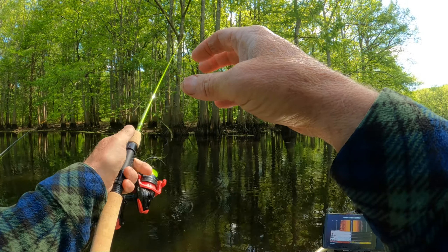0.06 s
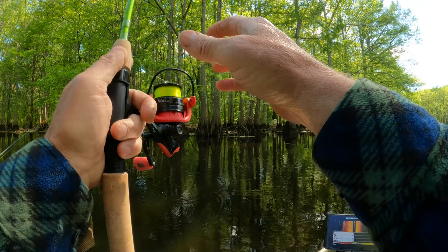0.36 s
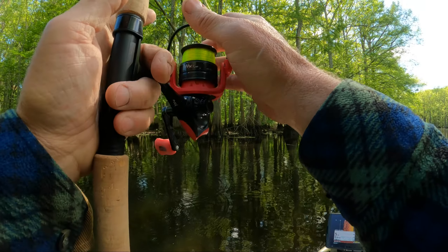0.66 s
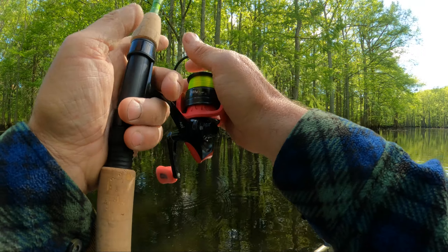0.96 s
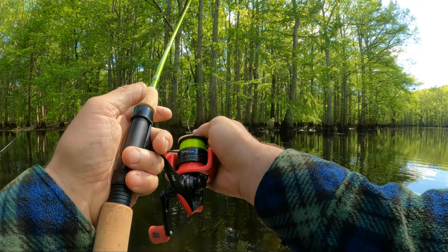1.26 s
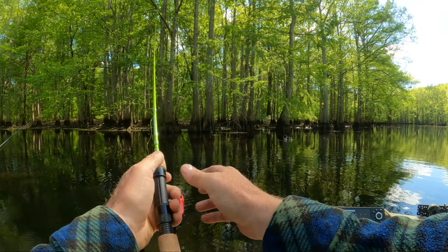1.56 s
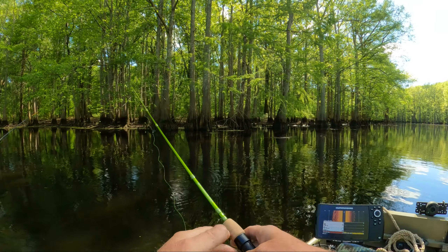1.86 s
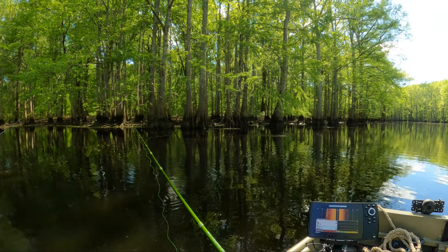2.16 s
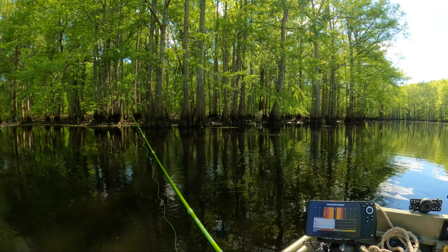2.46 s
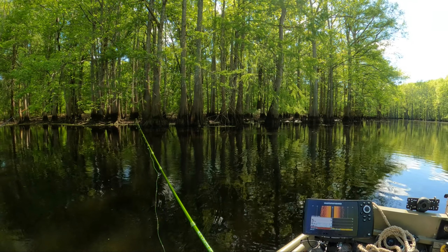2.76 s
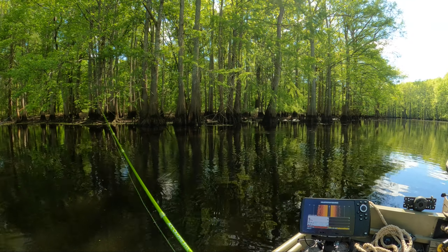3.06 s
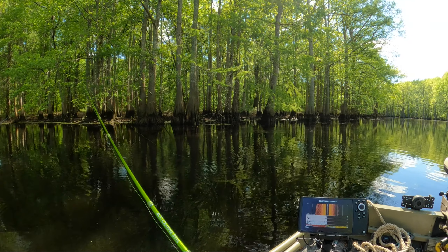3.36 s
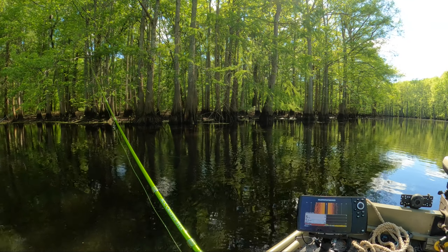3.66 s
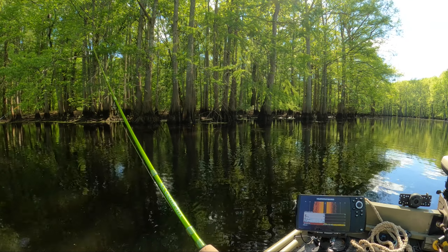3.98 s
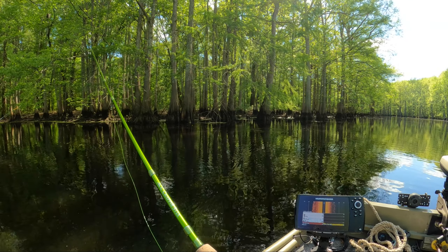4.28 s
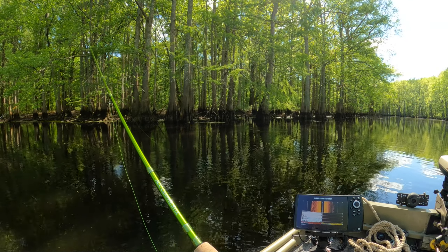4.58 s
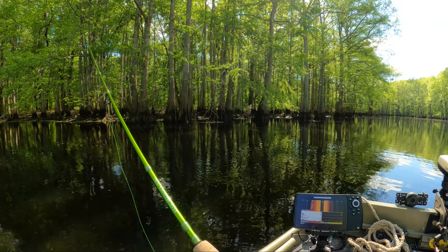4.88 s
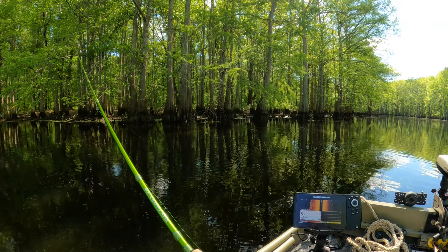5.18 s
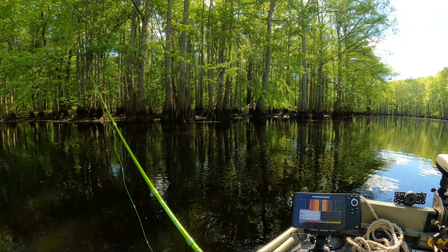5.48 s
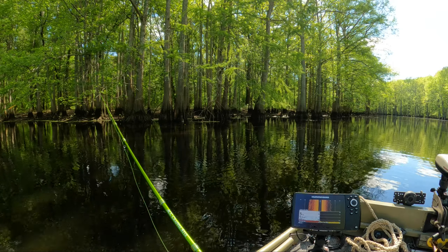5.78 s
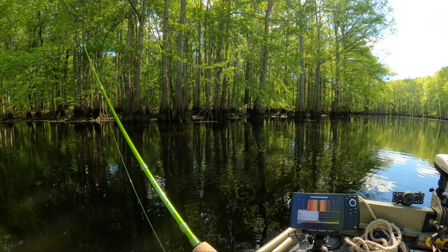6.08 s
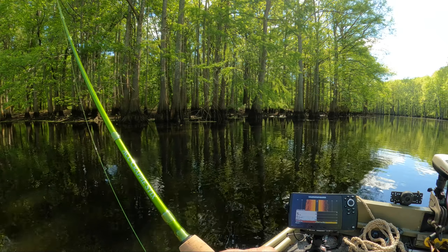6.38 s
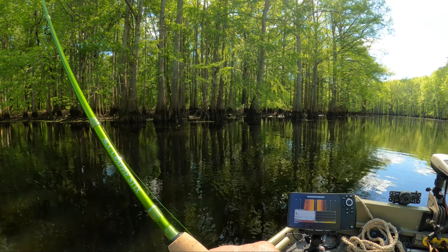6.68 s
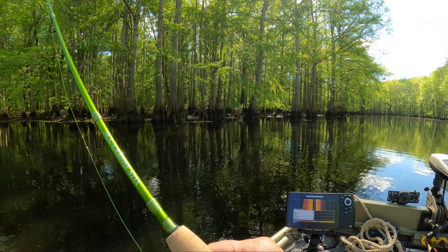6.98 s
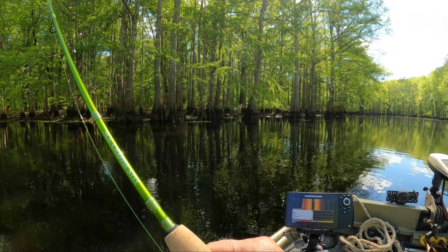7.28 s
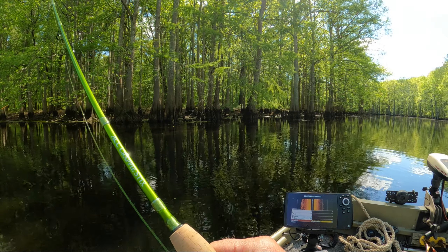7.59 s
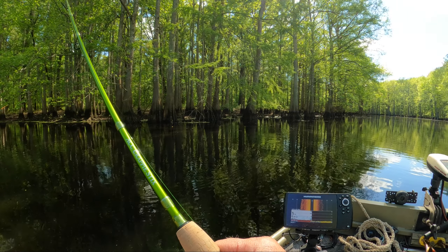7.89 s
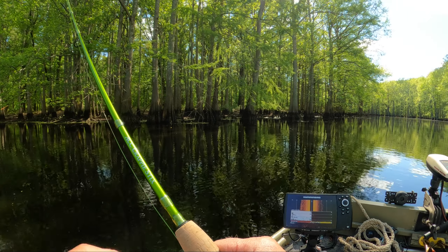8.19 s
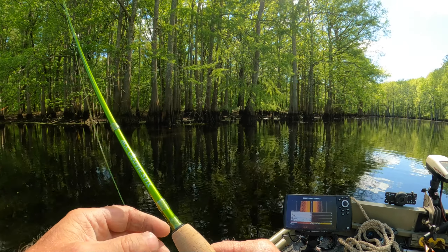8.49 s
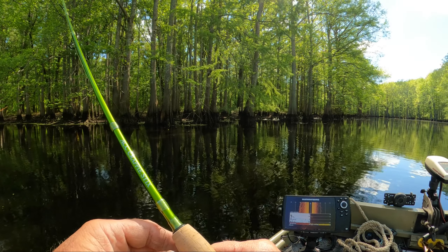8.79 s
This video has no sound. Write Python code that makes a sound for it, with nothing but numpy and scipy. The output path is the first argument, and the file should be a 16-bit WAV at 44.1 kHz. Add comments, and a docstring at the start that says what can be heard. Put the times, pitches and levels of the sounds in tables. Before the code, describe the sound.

A small electric motor hums at one low pitch throughout, with a light whirr, over the low drone of a metal boat on calm water. Right at the start, fishing line hisses off a spool close by with a thin whistle and a few clicks, dying away by about 1 second. The reel is handled, rasps briefly and snaps shut sharply at about 1.3 seconds. A sleeve rustles near 1.8 seconds, and dull knocks sound in the hull around 2 and 2.5 seconds. Taut line rasps again with small clicks until nearly 3 seconds. From there the motor carries on until about 9 seconds, with soft low bumps roughly once a second, a thin high hiss and faint ticks of tackle, the clearest near 8 seconds. Far birds give very faint, short chips around 3, 4 and 7.5 seconds.

```python
"""On calm water, a small electric motor pushes a metal fishing boat along, humming at one low pitch.
Line hisses off the spool and dies away; the reel is handled, rasps under taut line and snaps shut.
A sleeve rustles, and knocks ring the hull's low modes. Then the motor carries on over the drone of
hull and water, with soft low bumps, faint ticks of tackle, a thin hiss and far bird chips."""
import sys
import numpy as np
from scipy import signal
from scipy.fft import rfft, irfft, next_fast_len
from scipy.io import wavfile
from scipy.ndimage import map_coordinates

SR = 44100
rng = np.random.default_rng(int(sys.argv[2]) if len(sys.argv) > 2 else 0)


def put_to_file(sound):
    """Save the sound as 16-bit audio at rate SR, in the file named by the first command-line argument."""
    columns = np.atleast_2d(sound).T  # one column per channel
    safe = np.clip(columns, -1, 1)
    whole_steps = np.round(safe * 32767)
    wavfile.write(sys.argv[1], SR, whole_steps.astype(np.int16))


N = 394254
TIME = np.arange(N) / SR


def from_db(db):
    """Decibels to gain."""
    return 10 ** (np.asarray(db) / 20)


def rms_one(x):
    """Scale to unit power."""
    return x / np.sqrt(np.mean(x ** 2) + 1e-20)


def in_time(points):
    """Read a (time, value) curve at every sample."""
    return np.interp(TIME, *np.transpose(points))


def at_hz(points, hz):
    """Read a (frequency, value) curve along a log-frequency axis."""
    points_hz, values = np.transpose(points)
    return np.interp(np.log(hz + 1e-9), np.log(points_hz), values)


def pan(left_db):
    """Gains of the two channels for a left-minus-right level."""
    return from_db(np.array([[1], [-1]]) * left_db / 2)


def band(x, low_hz, high_hz, order=2):
    """Butterworth band-pass."""
    sos = signal.butter(order, [low_hz, min(high_hz, .45 * SR)], "band", fs=SR, output="sos")
    return signal.sosfilt(sos, x)


def envelope(s, length_s, attack_s, release_s=None):
    """Fade in up to time s, hold at 1, fade out; the release defaults to the attack time."""
    corners = s + np.array([-attack_s, 0, length_s, length_s + (release_s or attack_s)])
    return np.interp(TIME, corners, [0, 1, 1, 0]) ** 2


def swell(s, sigma_s):
    """A bell-shaped swell that peaks at time s."""
    return np.exp(-.5 * ((TIME - s) / sigma_s) ** 2)


def drift(rate):
    """Smooth random motion, changing about rate times a second; rms 1."""
    knots = rng.standard_normal(int(N / SR * rate * 2) + 4)
    return rms_one(map_coordinates(knots, [TIME * rate * 2 + 1], order=2))


def tone(hz):
    """A sine that follows a moving pitch; rms 1."""
    return np.sqrt(2) * np.sin(2 * np.pi * np.cumsum(hz) / SR)


def noise(spectrum, side=None):
    """Stereo noise of a given colour, rolled off beyond the curve's ends; rms 1."""
    # stereo image: (frequency [Hz], left-right likeness [0..1])
    likeness = [(30, 1), (150, 0.87), (300, 0.72), (700, 0.66), (1500, 0.683), (4000, 0.86), (12000, 0.8)]
    size = next_fast_len(N)
    hz = np.arange(size // 2 + 1) * SR / size + 1e-3
    rolloff = 1 / (1 + (spectrum[0][0] / hz) ** 4) / (1 + (hz / spectrum[-1][0] / 2) ** 4)
    shared, apart = rfft(rng.standard_normal((2, size))) * from_db(at_hz(spectrum, hz)) * rolloff
    alike = at_hz(likeness, hz)
    both = np.sqrt(1 + alike) * shared + np.sqrt(1 - alike) * apart * [[1], [-1]]
    return rms_one(irfft(both * pan(at_hz(side, hz) if side else 0), size)[:, :N])


def narrow_noise(hz, width_hz):
    """A band of noise around a steady or moving centre; rms 1."""
    phase = 2 * np.pi * np.cumsum(hz * np.ones(N)) / SR
    return rms_one(drift(width_hz / 2) * np.cos(phase) + drift(width_hz / 2) * np.sin(phase))


def struck(modes, t, spread_rad):
    """Decaying modes as (channel, mode, sample), left and right slightly out of phase."""
    hz, db, t60 = np.transpose(modes)[:, :, None]
    skew = rng.normal(0, spread_rad, hz.shape) * np.array([1, -1])[:, None, None]
    polarity = rng.choice([-1, 1], hz.shape)
    return polarity * from_db(db - 60 * t / t60) * np.sin(2 * np.pi * hz * t + skew)


def add(out, s, sound):
    """Mix a short sound in at time s."""
    start = round(s * SR)
    out[:, start:start + sound.shape[-1]] += sound[..., :N - start]


def air(hiss_db=-73.0, whine_db=-79.5):
    """A thin hiss wavers high above the hum; late on, a faint whine and one soft swish pass."""
    # colours of the hiss and the swish: (frequency [Hz], relative level [dB])
    hiss_colour = [(2500, -5), (4000, -8.5), (5400, -1.5), (7500, -5), (9500, -20.5), (12200, -19.5),
                   (14000, -39.5)]
    swish_colour = [(2600, 3), (4000, 1), (5500, -1.5), (6800, -5), (8200, -4.5), (10000, -23),
                    (12200, -19.5), (13300, -35.5)]
    # rise and fall of the swish: (time [s], level [dB])
    swish_level = [(5.6, -100), (5.85, -71), (6.03, -65.5), (6.14, -61), (6.35, -65.5), (6.56, -65),
                   (6.7, -74), (7.1, -100)]
    whine = from_db(whine_db) * envelope(5.96, 2.7, attack_s=.7) * narrow_noise(5570, width_hz=90)
    hiss = from_db(hiss_db - .8 * drift(1.8)) * noise(hiss_colour)
    swish = from_db(in_time(swish_level)) * noise(swish_colour)
    return (whine + hiss + swish) * pan(.98)


def birds(fall_octaves_per_s=4.0):
    """Far birds give short, high chips that slide down in pitch."""
    # chips: (time [s], starting pitch [Hz], level [dB])
    chips = [(2.995, 6600, -67), (3.92, 7540, -72), (7.578, 8200, -68.5)]
    out = 0
    for s, hz, db in chips:
        falling_hz = hz * 2 ** (-fall_octaves_per_s * np.clip(TIME - s, 0, 1))
        out += from_db(db) * envelope(s, length_s=.022, attack_s=.008) * tone(falling_hz)
    return out


def boat(drone_db=-47, wash_db=1.5, rest_db=-49.5, sway_hz=11.0, bump_hz=25):
    """The boat rocks with a deep rumble; the drone of hull and water lifts with each soft bump."""
    # swells of the rocking, and soft low bumps: (time [s], level [dB])
    rocks = [(.15, -24.5), (1.5, -35.5), (2.1, -34.5), (2.8, -39.5), (5.151, -31.5), (6.6, -49.5),
             (7.35, -49), (8.5, -37.5)]
    bumps = [(.93, -29.5), (1.44, -33), (2.36, -36), (3.3, -29.5), (4.301, -26), (5.302, -32), (6.342, -33),
             (7.38, -25), (8.469, -28.5)]
    # drone of hull and water: (frequency [Hz], relative level [dB])
    drone_colour = [(25, 14.5), (50, 9), (85, 3), (125, 0.5), (220, -2.5), (300, -5.5), (400, -9),
                    (520, -9), (650, -14), (760, -19.5), (1100, -35)]
    sway = from_db(rest_db) + sum(from_db(db) * swell(s, .23) for s, db in rocks)
    rumble = sway * np.sqrt(2) * np.sin(2 * np.pi * sway_hz * TIME + drift(9.8))
    for s, db in bumps:
        rumble += from_db(db) * swell(s, .047) * np.sin(2 * np.pi * (bump_hz * TIME + rng.random()))
    wash = sum(swell(s, .053) for s, _ in bumps)
    drone = from_db(drone_db + wash_db * wash + drift(10)) * noise(drone_colour)
    return rumble * pan(-7.0) + drone


def hull_knocks():
    """Dull blows ring the hull's low, quickly damped modes."""
    # hull modes: (frequency [Hz], level [dB], T60 [s])
    modes = [(92, 9.5, 0.029), (200, 5, 0.022), (361, 2.5, 0.021), (626, 1, 0.018)]
    # blows: (time [s], gain [dB], low cut [Hz])
    knocks = [(0.9035, -47, 300), (0.9322, -38, 300), (2.067, -26.5, 49.5), (2.464, -32, 420)]
    out, t = np.zeros((2, N)), TIME[:SR // 5]
    for s, db, low_hz in knocks:
        ring = struck(modes, t, spread_rad=.34).sum(axis=1)
        add(out, s, from_db(db) * band(ring, low_hz, 690, order=4))
    return out


def motor(shaft_hz=51.08, waver=.07, flutter=.003, whirr_db=-52, throb_db=7.5):
    """Shaft harmonics hum through the hull; the housing's whirr flares once a turn and fades."""
    # harmonics of the hum, and their early tint: (multiple of the shaft rate, gain [dB])
    harmonics = [(1, -14), (2, -7), (3, 0), (4, -19.5), (5, -16), (6, -18.5), (7, -23.5), (8, -28),
                 (9, -26.5), (10, -21), (11, -17.5), (12, -38), (13, -22.5), (15, -41.5), (17, -37),
                 (21, -43.5), (22, -36), (23, -27.5), (24, -38), (25, -27), (32, -29), (39, -39.5)]
    early_colour = [(2, -1.5), (3, 0), (5, 2), (6, 4), (7, 2), (11, -1), (13, -1), (15, 0)]
    # fader ride of the hum: (time [s], level [dB])
    hum_level = [(0, -42.5), (1.3, -45), (2.3, -41.5), (5.3, -42), (8.94, -42.5)]
    # whirr of the housing: (frequency [Hz], relative level [dB])
    whirr_colour = [(700, -39.5), (820, -13), (960, -2.5), (1050, 1), (1090, -6.5), (1150, 2), (1280, -0.5),
                    (1430, -0.5), (1640, 2.5), (1830, -4.5), (1980, -1.5), (2220, -9.5), (2360, -9),
                    (2500, -12.5), (2800, -16.5), (3800, -24.5), (6000, -35), (10000, -54.5)]
    # its balance: (frequency [Hz], left minus right [dB])
    whirr_side = [(700, -2.5), (1300, 6), (2400, 4), (4400, -2), (8000, 11)]
    turns = shaft_hz * TIME + .012 * drift(.7) + .0014 * drift(8)
    early = envelope(0, 2.53, .36)   # the tint holds, then the colour settles
    hum = 0
    for multiple, db in harmonics:
        early_db = np.interp(multiple, *np.transpose(early_colour))
        tint = 1 + (from_db(early_db) - 1) * early
        strength = from_db(db) * tint * (1 + waver * drift(4)) + flutter * drift(6)
        hum += strength * np.sin(2 * np.pi * (multiple * turns + rng.random()))
    stroke = np.interp(turns % 1, [0, .13, 1], [0, 1, 0])   # fast rise, slow fall
    flare = rms_one(from_db(throb_db * stroke + drift(25)))
    whirr = from_db(whirr_db + .67 * drift(.89)) * flare * noise(whirr_colour, whirr_side)
    return np.sqrt(2) * from_db(in_time(hum_level)) * hum * pan(-.9) + whirr


def tackle(t60_s=.013, top_hz=8500):
    """Light touches of line and tackle: tiny bursts, dry or pinging, that die at once."""
    # ticks: (time [s], peak [dB], centre [Hz], half width [octaves])
    ticks = [(3.436, -47, 4370, .7), (3.528, -46, 4400, .45), (3.82, -43.5, 5200, 0.51),
             (4.257, -47.5, 7000, .13), (5.37, -52, 5200, 0.54), (5.522, -48.5, 6500, .5),
             (7.852, -37, 3300, 0.37), (8.048, -44, 4400, .35), (8.1345, -43.5, 7000, 0.38),
             (8.143, -43, 6500, .12), (8.168, -48, 3800, 0.61), (8.185, -48, 3800, .45),
             (8.6722, -48.5, 6500, 0.15)]
    out, t = np.zeros((2, N)), TIME[:SR // 10]
    lowpass = signal.butter(2, top_hz, fs=SR, output="sos")
    for s, db, hz, octaves in ticks:
        burst = rng.standard_normal(len(t)) * from_db(-60 * t / t60_s)
        tick = signal.sosfilt(lowpass, band(burst, hz / 2 ** octaves, hz * 2 ** octaves))
        add(out, s, from_db(db) * tick / np.abs(tick).max())
    return out * pan(4.5)


def handling(sleeve_rest_db=-82.5, grain_db=1.5):
    """As the arm moves, the sleeve rubs brightly and the hand dully on the rod, in many small catches."""
    # arm moves: (start [s], length [s], sleeve level [dB], hand level [dB])
    moves = [(0.0, 1.1, -68.5, -57), (0.898, 0.081, -53, -45.5), (1.09, 0.26, -61, -52),
             (1.5, 0.5, -64, -56.5), (1.747, 0.019, -50.5, -60), (1.791, 0.085, -45.5, -56),
             (1.919, 0.051, -47.5, -54), (2.05, 0.025, -67, -52), (2.146, 0.098, -66, -52),
             (2.31, 0.16, -62, -54), (2.545, 0.07, -61, -49), (2.667, 0.056, -57, -47.5),
             (2.78, 0.36, -71, -61.5), (3.747, 0.37, -78, -85), (5.299, 0.27, -72.5, -85),
             (7.684, 0.58, -70.5, -81.5), (8.59, 0.4, -75, -78)]
    # colours of cloth and grip: (frequency [Hz], relative level [dB])
    sleeve_colour = [(1200, -7), (2200, -6), (3200, -4.5), (4000, -3), (5300, -0.5), (7200, -0.5),
                     (8300, -4), (10000, -18.5), (12200, -13), (13500, -29), (16000, -40.5)]
    hand_colour = [(50, 5.5), (110, 7), (200, -4), (330, -3), (600, -7.5), (800, -16.5), (1400, -9.5),
                   (2400, -16), (4000, -22.5)]
    # the sleeve sings on fast strokes: (start [s], length [s], centre [Hz], level [dB])
    zips = [(1.81, .035, 7150, -47), (1.856, .02, 7600, -52), (1.933, 0.045, 5500, -53.5)]
    rub, grip = from_db(sleeve_rest_db), 0
    for s, length, sleeve_db, hand_db in moves:
        motion = envelope(s, length, attack_s=.013 + .42 * length)   # longer moves ease in and out
        rub += from_db(sleeve_db) * motion
        grip += from_db(hand_db) * motion
    grain = from_db(grain_db * drift(200))
    sleeve = rub * grain * noise(sleeve_colour)
    hand = grip * grain * noise(hand_colour)
    for s, length, hz, db in zips:
        sleeve += from_db(db) * envelope(s, length, attack_s=.02) * narrow_noise(hz, width_hz=600)
    return sleeve * pan(.76) + hand


def line_rasp(slips_per_s=170, uneven=.3, slip_depth_db=13):
    """Taut line sticks and slips over the reel in a fast, uneven run; each slip flares and fades."""
    # pulls that wind the line tight: (start [s], length [s], level [dB])
    pulls = [(0.884, 0.11, -54.5), (2.582, 0.052, -52.5), (2.668, 0.1, -55.5)]
    # colour of the rasp: (frequency [Hz], relative level [dB])
    colour = [(900, 15), (1300, -6), (2200, -6), (3000, -3), (5000, -5), (7300, -9), (10000, -39),
              (12200, -22), (13500, -42)]
    slips = np.cumsum(slips_per_s * (1 + uneven * drift(60))) / SR
    flare = rms_one(from_db(-slip_depth_db * (slips % 1)))
    pull = sum(from_db(db) * envelope(s, length, attack_s=.024) for s, length, db in pulls)
    return pull * flare * noise(colour)


def cast(run_db=-52, slack_db=-60.5, wobble_hz=22, rough_db=5.0, sag_octaves_per_s=2.0):
    """Line hisses and sizzles over the spool's lip; a thin whistle flares; swishes fall as it slows."""
    # colours of running line, slack line and the lip: (frequency [Hz], relative level [dB])
    run_colour = [(2500, 2.5), (4100, -12), (4900, -2.5), (6200, -2), (7900, 2.5), (9200, 0.5),
                  (10300, -10), (14000, -29)]
    slack_colour = [(4200, -6), (5000, 6), (5600, 6), (6400, -3), (8200, -8), (8450, 1), (8750, -10),
                    (10500, -24)]
    lip_colour = [(9500, -23), (11000, -5), (12000, 6), (13300, -6), (15500, -14)]
    # fast line brushes the lip: (start [s], length [s], level [dB])
    brushes = [(0, 0.4, -60), (0.177, 0.26, -60.5), (.485, .006, -69)]
    # a thin, hoarse high whistle flares with the line's hiss: (time [s], level [dB])
    flares = [(.06, -66), (.19, -52), (.225, -56), (.315, -60), (.39, -54.5), (.91, -65)]
    # tones of that whistle: (frequency [Hz], gain [dB])
    whistle_tones = [(5632, 4), (8450, -15)]
    # the last coils swish through the rod rings: (start [s], length [s], centre [Hz], level [dB])
    coils = [(0.44, 0.076, 8400, -50), (0.529, 0.016, 6640, -54), (0.599, 0.022, 7530, -52.5),
             (0.713, .008, 6500, -61)]
    flicker = from_db(1.4 * drift(60.5))
    running = from_db(run_db) * envelope(0, .46, .16)
    slack = from_db(slack_db) * envelope(0, 1.0, .16)   # slack line trickles on after the run
    hiss = flicker * (running * noise(run_colour) + slack * noise(slack_colour))
    brushing = sum(from_db(db) * envelope(s, length, attack_s=.041) for s, length, db in brushes)
    sizzle = brushing * flicker * noise(lip_colour)
    flaring = sum(from_db(db) * envelope(s, 0, attack_s=.05, release_s=.09) for s, db in flares)
    flaring += from_db(-8.5) * slack   # the whistle lingers under the slack line's hiss
    flaring *= rms_one(from_db(rough_db * drift(150)))   # a hoarse edge
    whistle = flaring * sum(from_db(db) * tone(hz + wobble_hz * drift(29.8)) for hz, db in whistle_tones)
    swish, edge_s = 0, .024
    for s, length, hz, db in coils:
        falling_hz = hz * 2 ** (-sag_octaves_per_s * np.clip(TIME - s, -edge_s, 1))
        swish += from_db(db) * envelope(s, length, edge_s) * narrow_noise(falling_hz, width_hz=1900)
    return (hiss + swish) * pan(2.4) + sizzle * pan(8.2) + whistle


def reel(contact_s=.00016, crack_t60_s=.007, scatter_db=-42, scatter_t60_s=.05):
    """Each contact cracks and rings the reel, woody or bright; the boat scatters a short tail."""
    # contacts: (time [s], four band levels from low to high [dB], ring length [ratio], bail wire [Hz])
    contacts = [(0.041, -49, -44.5, -53, -63, 0.46, 4700), (.072, -66, -62.5, -51, -50, 0.45, 5000),
                (0.0932, -55, -46, -50, -52, 0.29, 5000), (0.192, -56, -48.5, -47, -52, 1.2, 4900),
                (0.2892, -51, -49, -45.5, -54, 0.64, 5000), (0.882, -43, -52, -52, -52, 0.8, 4700),
                (0.9046, -44, -43, -41, -58, 0.84, 4800), (0.9315, -45, -40.5, -36, -53, 0.41, 4800),
                (.956, -56, -61, -44, -56, .7, 4860), (0.961, -48, -46.5, -41, -59, 1, 4800),
                (1.0786, -37, -40.5, -43.5, -51, 1.1, 4900), (1.0882, -44, -48, -46, -46, 1.3, 5000),
                (1.1048, -52, -55, -51, -51, 0.66, 4900), (1.11, -45, -47.5, -53, -57, .9, 4700),
                (1.1233, -58, -58, -54, -53, 0.36, 5000), (1.215, -53, -60, -55, -55, .6, 5000),
                (1.2664, -30, -40, -46, -55, 1.24, 4700), (1.272, -48, -51, -48, -43, .7, 4900),
                (1.2813, -30.5, -25.5, -27.5, -21, 0.81, 4840), (1.404, -38, -41.5, -51, -64, 1.6, 4770),
                (1.4082, -42, -38, -52, -49.5, 1.2, 4900), (1.421, -41, -56, -57, -70, 2.1, 4800),
                (1.4936, -47.5, -45, -58, -66, 0.37, 4360), (1.5, -50, -46, -41, -60, 0.82, 4300),
                (2.4633, -49, -44, -41.5, -48.5, 0.43, 4920), (2.578, -55, -51, -57, -69, .4, 4500),
                (2.621, -50, -49, -50, -64, 0.39, 4130), (2.705, -53, -54, -60, -61, 0.58, 4500),
                (2.7257, -44, -48, -58, -64, 0.62, 4500), (2.754, -50, -56, -67, -66, .7, 4500),
                (5.3081, -54, -56, -53.5, -60, 0.47, 5200)]
    # edges of those four bands [Hz]
    edges = [1100, 1800, 3000, 5500, 15000]
    # modes of reel and rod: (frequency [Hz], relative level [dB], T60 [s])
    body_modes = [(1351, -15.5, 0.023), (1385, -6.5, 0.02), (2100, -9, 0.026), (2360, -3.5, .02),
                  (2710, -16, 0.015), (3990, -8.5, .016), (5500, -9.5, 0.013), (5950, -7, 0.012),
                  (6500, -5.5, 0.014), (6960, -0.5, 0.011), (7500, -3.5, .009), (8850, -11, .011),
                  (9900, -13, 0.006), (12200, -12.5, .008)]
    # their balance: (frequency [Hz], left minus right [dB])
    side = [(1400, -2.5), (2400, 0.5), (6500, -2), (8500, 5), (12000, 9)]
    out, t = np.zeros((2, N)), TIME[:SR // 8]
    for s, *bands_db, ring_length, wire_hz in contacts:
        wire_mode = (wire_hz, -1.5, .016)   # the bail's note shifts with the point of contact
        # the grip damps the modes and shifts the pitch and strength of each
        modes = np.array(body_modes + [wire_mode]) * [1, 1, ring_length]
        modes[:, 0] *= rng.normal(1, .012, len(modes))
        modes[:, 1] += rng.normal(0, 1.8, len(modes))
        balance = pan(at_hz(side, modes[:, 0]))[:, :, None]
        ring = (balance * struck(modes, t, spread_rad=.2)).sum(axis=1)
        crack = from_db(.5 - 60 * t / crack_t60_s) * rng.standard_normal(len(t))
        blow = (ring + band(crack, 1400, 8400)) * (1 - np.exp(-t / contact_s))
        parts = [rms_one(band(blow, low, high, order=3)) for low, high in zip(edges, edges[1:])]
        click = sum(from_db(db) * part for db, part in zip(bands_db, parts))
        click *= np.sqrt(.01 / t[-1])   # each band carries the energy of 10 ms at its level
        decay = from_db(scatter_db - 60 * t / scatter_t60_s) * (1 - np.exp(-t / .001))
        scatter = rng.standard_normal((2, len(t))) * decay
        tail = signal.fftconvolve(click, scatter, axes=1)[:, :len(t)]
        add(out, s, click + tail)
    return out * pan(.76)


def scene():
    """Close fishing gear over a bed of motor, boat and open air."""
    bed = motor() + boat() + hull_knocks() + air() + birds()
    return bed + cast() + handling() + line_rasp() + tackle() + reel()


def record(dry, cutoff_hz=15800):
    """A steep low-pass trims the very top."""
    return signal.sosfilt(signal.ellip(10, .1, 80, cutoff_hz, fs=SR, output="sos"), dry)


dry = scene()
out = record(dry)
put_to_file(out)
```